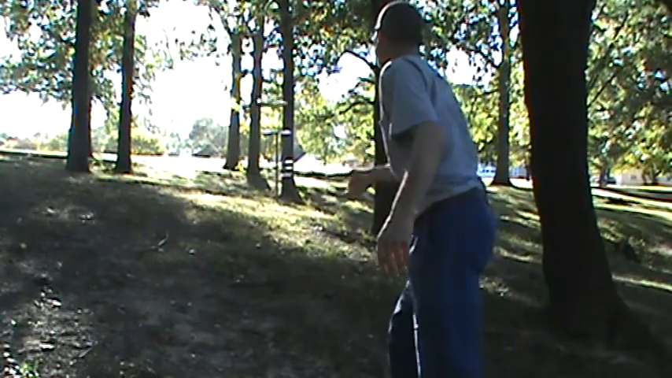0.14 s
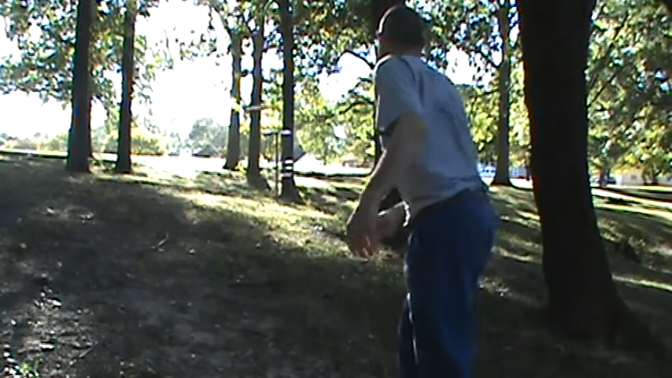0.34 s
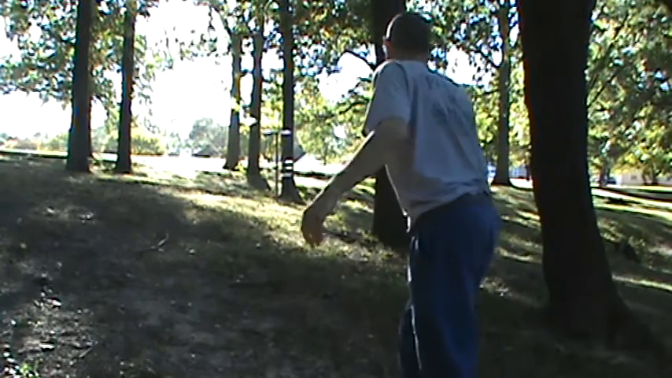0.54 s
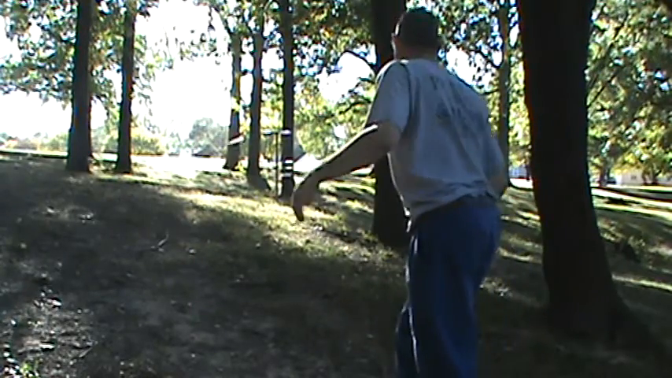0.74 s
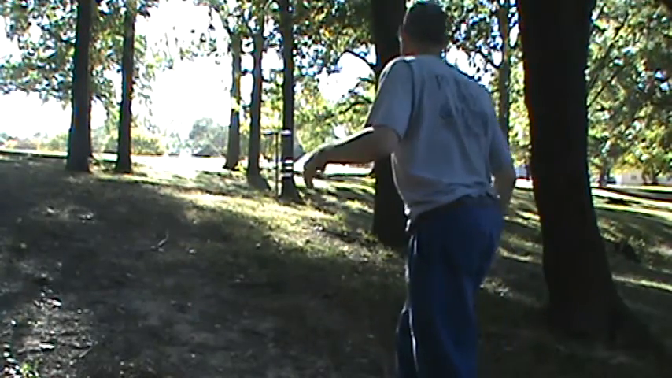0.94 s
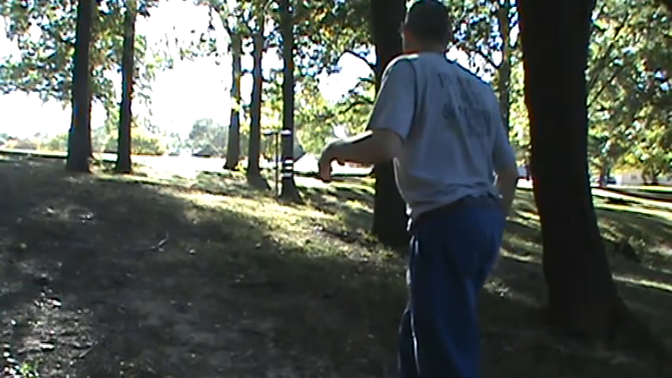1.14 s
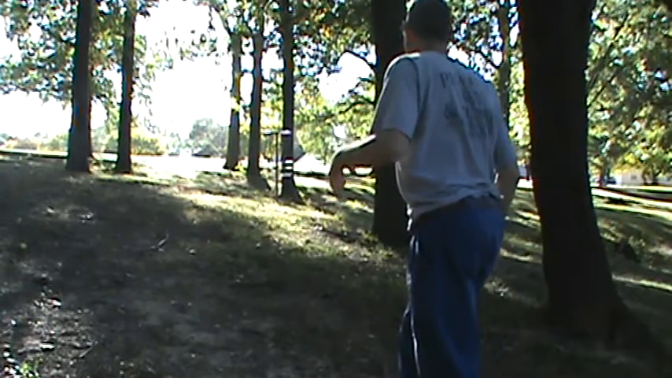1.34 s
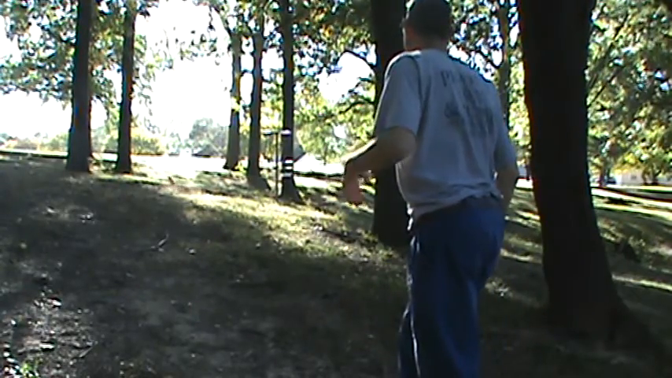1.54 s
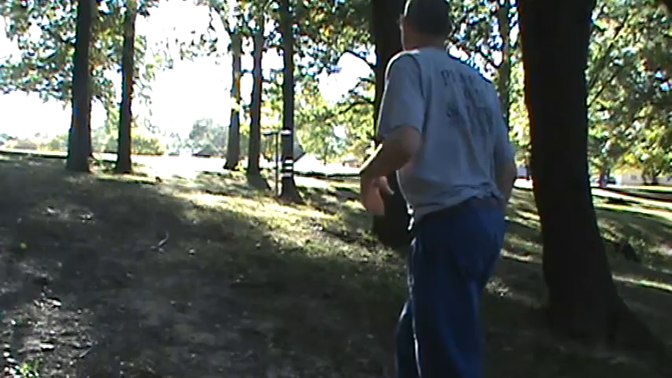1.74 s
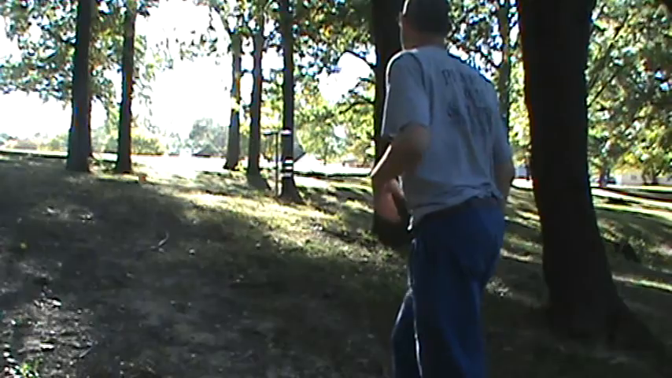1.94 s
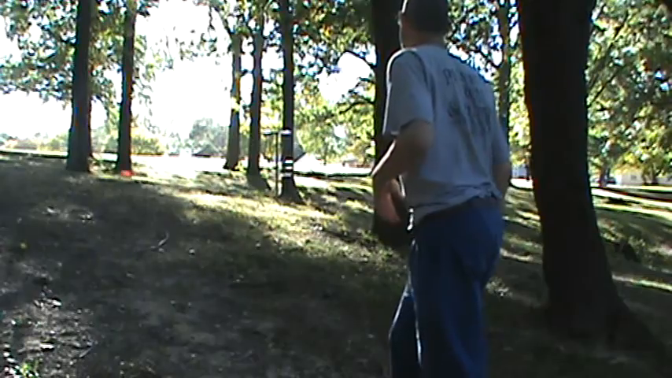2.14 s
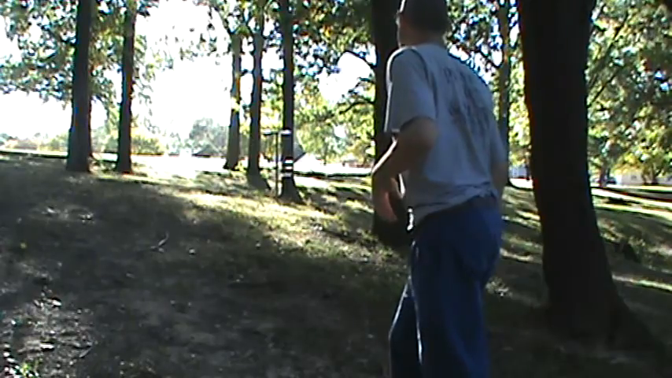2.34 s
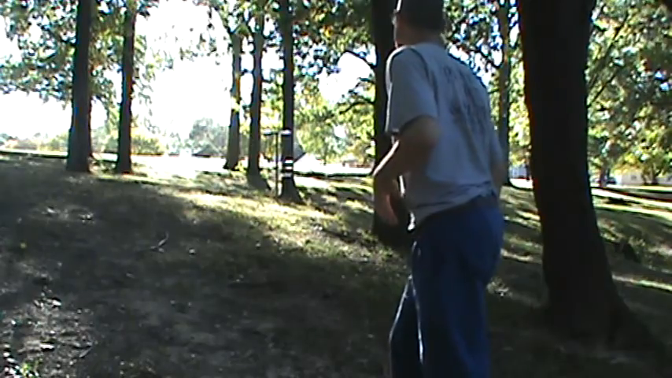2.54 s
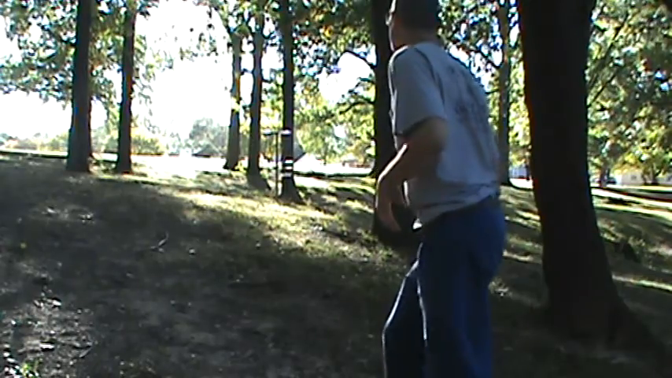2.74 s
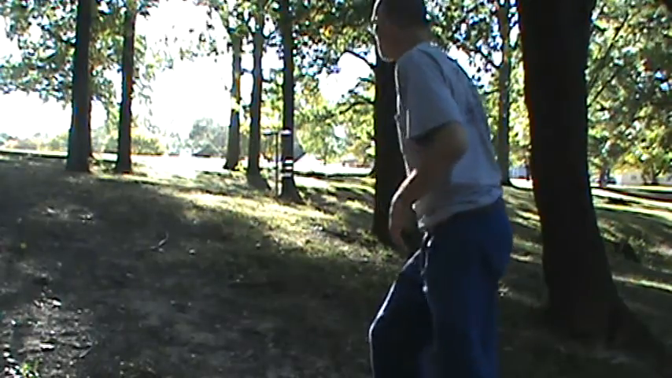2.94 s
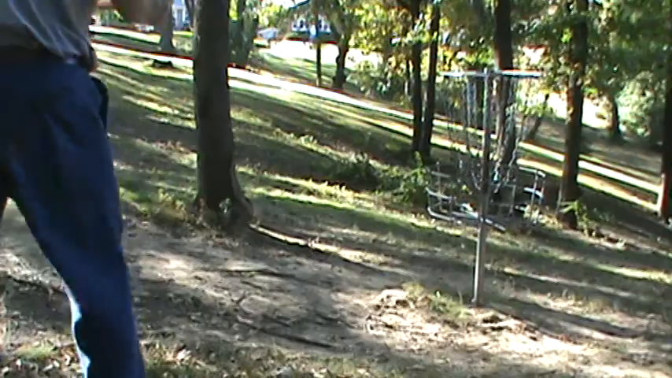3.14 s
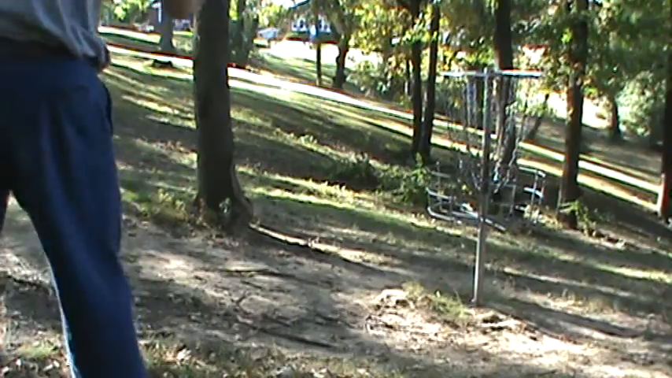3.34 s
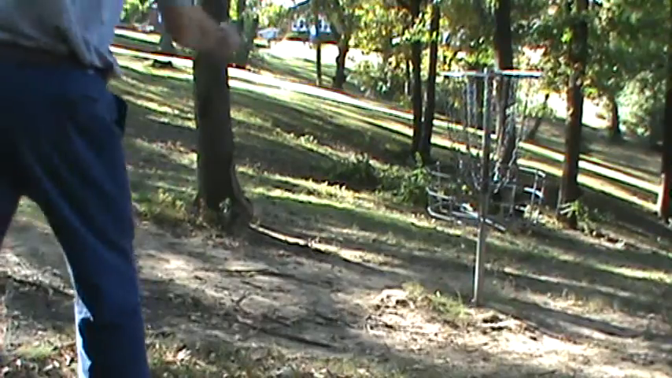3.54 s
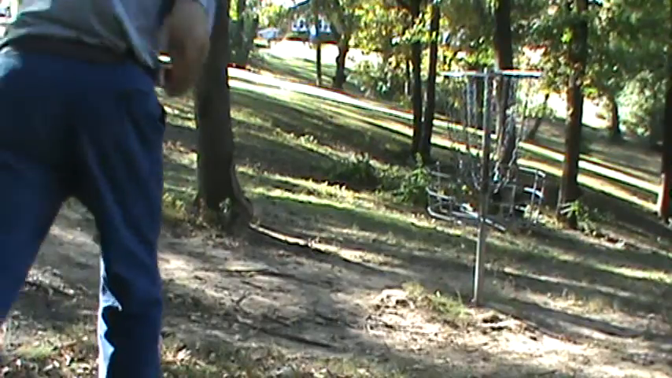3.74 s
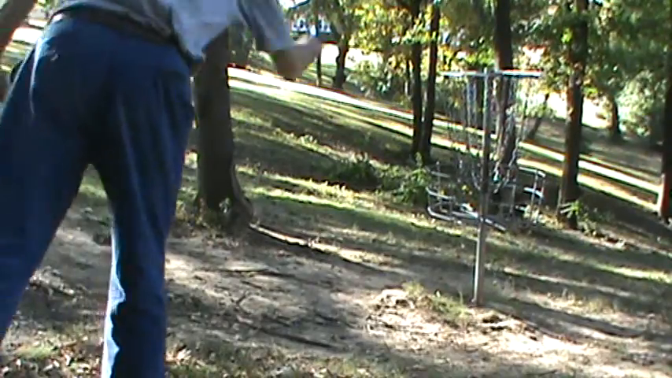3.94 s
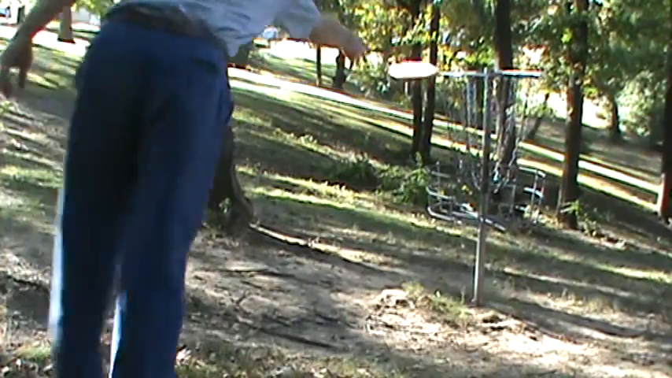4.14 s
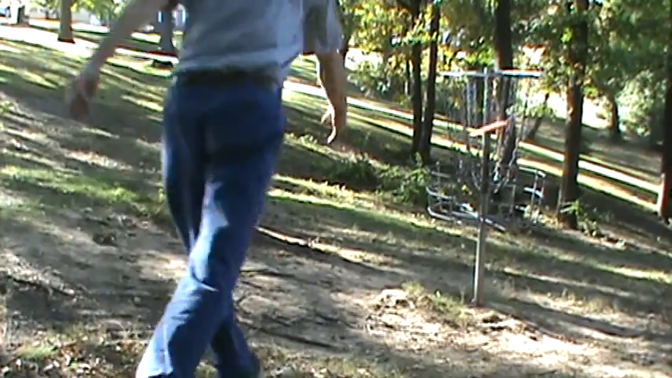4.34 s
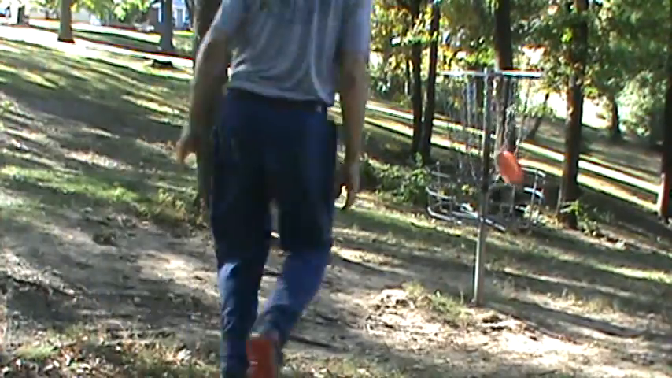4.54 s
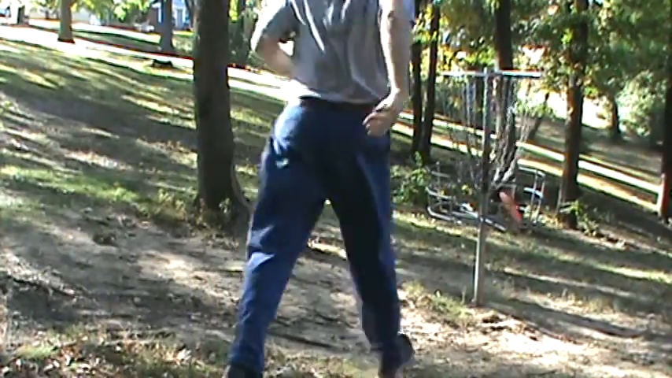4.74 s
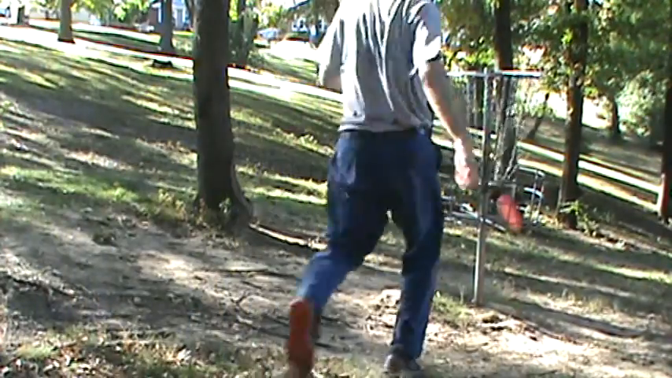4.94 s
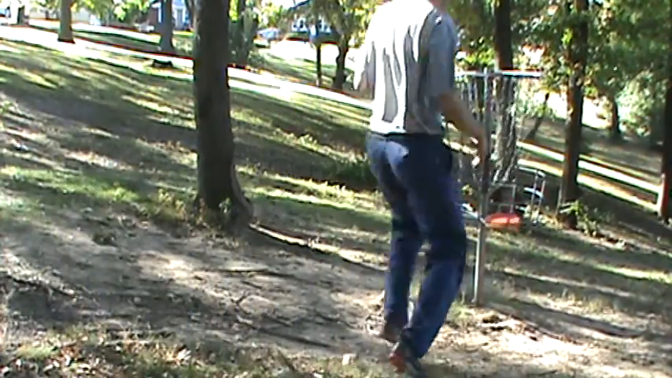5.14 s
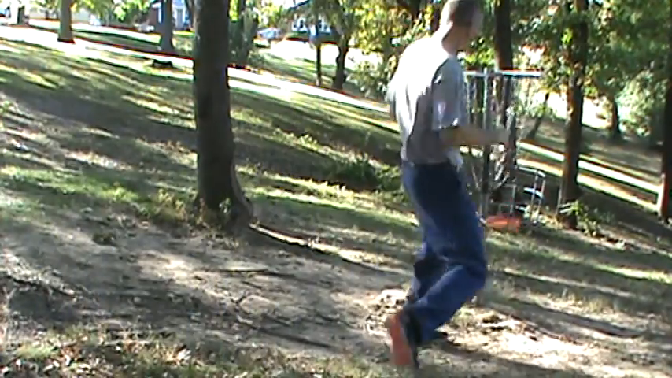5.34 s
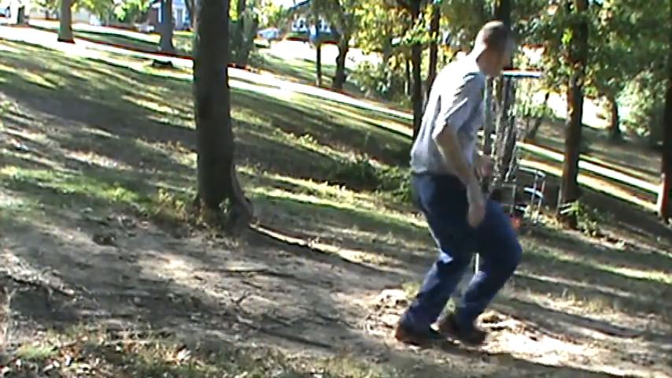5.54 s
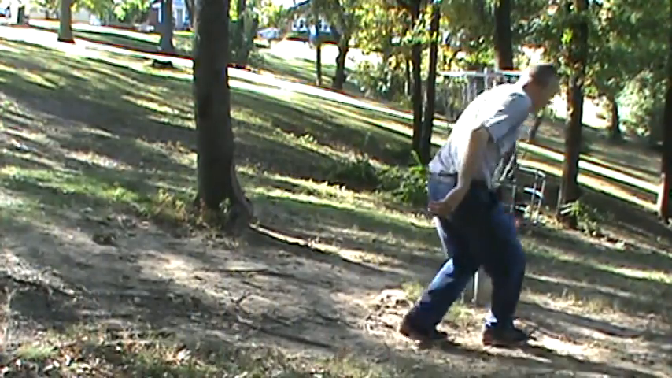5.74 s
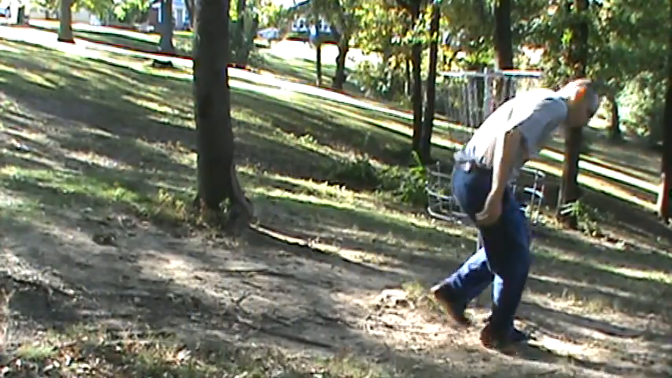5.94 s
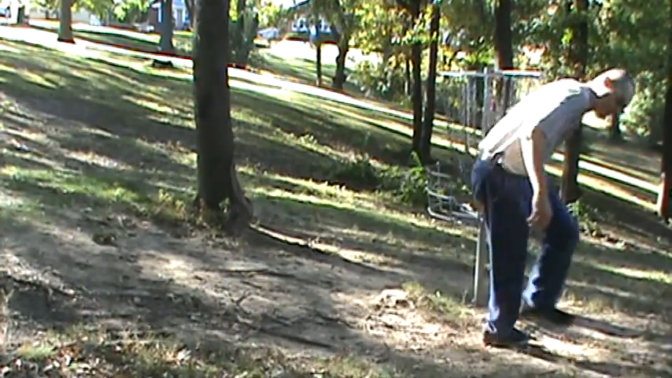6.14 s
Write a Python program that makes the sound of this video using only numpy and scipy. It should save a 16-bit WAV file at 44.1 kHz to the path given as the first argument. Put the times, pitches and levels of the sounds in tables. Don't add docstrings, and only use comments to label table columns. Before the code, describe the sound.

Footsteps crackle dry leaves and snap twigs over distant road roar, then wind buffets and a disc crashes into jangling steel chains.

```python
import sys
import numpy as np
from scipy import signal
from scipy.fft import rfft, irfft, next_fast_len
from scipy.io import wavfile

SR = 44100
rng = np.random.default_rng(int(sys.argv[2]) if len(sys.argv) > 2 else 0)


def digitize_waveform(pressure):
    field = np.atleast_2d(pressure).T
    bounded = np.clip(field, -1, 1)
    quanta = np.round(bounded * 32767).astype(np.int16)
    wavfile.write(sys.argv[1], SR, quanta)


def field_ratio(decibels):
    return 10 ** (np.asarray(decibels, dtype=float) / 20)


N = 277785
TIME = np.arange(N) / SR
CUT_S = 3.1085


def evened(x):
    return x / np.sqrt(np.mean(x ** 2) + 1e-20)


def read(points, hz):
    f, value = np.transpose(points)
    return np.interp(np.log(hz + 1), np.log(f + 1), value)


def coloured(x, points):
    size = next_fast_len(N)
    gain = field_ratio(read(points, np.fft.rfftfreq(size, 1 / SR)))
    return evened(irfft(rfft(x, size) * gain, size)[..., :N])


def band(x, hz, width_hz, order=2):
    edges = np.clip([hz - width_hz / 2, hz + width_hz / 2], 20, SR / 2 - 500)
    return signal.sosfilt(signal.butter(order, edges, "bandpass", fs=SR, output="sos"), x)


def drift(hz):
    return evened(signal.sosfilt(signal.butter(2, hz, fs=SR, output="sos"), rng.standard_normal(N)))


# f/Hz, density/dB per Hz
TRAFFIC = [(15, -36), (25, -16.5), (75, 0.5), (112, -4), (161, -6), (218, -9), (294, -10), (331, -14),
           (547, -13.5), (616, -13), (1120, -15), (1950, -26), (2500, -36), (3000, -39), (3900, -49.5),
           (6600, -120)]
# f/Hz, density/dB per Hz
HISS = [(1500, -13), (2600, -3), (3900, 6), (7000, 5), (10000, 2.5), (14800, -0.5), (15400, 10),
        (15850, -14)]
# f/Hz, correlation/1
LIKENESS = [(60, 1), (130, 1), (290, 0.94), (640, 0.87), (1410, 0.57), (3100, 0.34), (6820, 0.21),
            (15000, 0.7)]
# f/Hz, level/dB
BALANCES = [(60, 0.5), (110, -0.5), (200, 0), (380, -0.5), (700, -3), (1290, -1), (2380, 2.5), (4400, -1),
            (8120, 1.5), (15000, 0)]


def traffic(roar_db=-35.5, hiss_db=-57):
    size = next_fast_len(N)
    hz = np.fft.rfftfreq(size, 1 / SR)
    same = np.clip(read(LIKENESS, hz), -1, 1)
    lean = field_ratio(read(BALANCES, hz) / 2)
    a, b = rfft(rng.standard_normal((2, size)))
    left = a * lean
    right = (same * a + np.sqrt(1 - same ** 2) * b) / lean
    pair = irfft(np.array([left, right]), size)[:, :N]
    roar = field_ratio(roar_db + 0.58 * drift(1.07)) * coloured(pair, TRAFFIC)
    return roar + field_ratio(hiss_db) * coloured(pair, HISS)


# t/s, level/dB
GUSTS = [(3.12, -56), (3.13, -33.5), (3.5, -31.5), (3.55, -26), (3.91, -27), (4.15, -26), (4.52, -36.5),
         (4.62, -29), (5.38, -31), (5.55, -35.5), (5.64, -31), (5.9, -27), (6.12, -40.5), (6.3, -28.5)]
# f/Hz, density/dB per Hz
WIND_MID = [(12, -41), (20, -21.5), (59, -1), (81, -0.5), (145, -3.5), (248, -18.5), (286, -15.5),
            (375, -63), (600, -50), (780, -67), (1320, -120)]
# f/Hz, density/dB per Hz
WIND_SIDE = [(12, -41), (20, -23), (57, 3), (125, 9), (325, -11.5), (381, -28), (414, -13), (492, -17),
             (600, -16), (780, -49), (1320, -120)]


def wind(side_db=-3.5, lumpy_db=3.0, sweep=0.71, skew=0.2):
    eddies, others = rng.standard_normal((2, N)) * field_ratio(lumpy_db * drift(42.0))
    mid = coloured(eddies, WIND_MID)
    ahead = -signal.hilbert(eddies, next_fast_len(N))[:N].imag
    side = field_ratio(side_db) * coloured(sweep * ahead + (1 - sweep) * others, WIND_SIDE)
    push = np.array([mid + side, mid - side])
    push += skew * band(push ** 2, 460, 1100)
    gust = field_ratio(np.interp(TIME, *np.transpose(GUSTS)))
    return gust * (TIME > 3.11) * push


def trees(x):
    taps, t = np.zeros((2, 8000)), np.arange(8000) / SR
    at = np.arange(120, 7900, 40) + rng.integers(0, 40, (2, 195))
    np.put_along_axis(taps, at, rng.choice([-1., 1.], at.shape), 1)
    taps *= field_ratio(-60 * t / 0.013)
    return signal.fftconvolve(x[None], taps / np.linalg.norm(taps[0]), axes=1)[:, :N]


# peak t/s, level/dB, rise/s, fall/s, brightness/dB
SCUFFS = [(0.0, -61.5, .01, 0.071, 11.5), (0.205, -42.5, .01, 0.068, 8.5), (0.226, -43.5, 0.027, 0.028, 8),
          (0.27, -49, .08, 0.056, -3), (0.322, -50, 0.06, 0.046, 12.5), (0.3, -53, 0.027, .04, 4),
          (0.355, -50.5, 0.04, 0.06, 7), (0.38, -57.5, .03, 0.071, 7), (0.5, -75, .2, 1.4, -3),
          (1.366, -55, 0.23, 0.039, 5), (3.08, -56, 0.021, 0.055, 15.5), (3.14, -44, 0.023, 0.14, 3),
          (3.185, -36.5, 0.026, 0.044, -3), (3.208, -39, 0.014, 0.066, 6), (3.228, -41, 0.067, 0.02, 3),
          (3.255, -59, .02, 0.017, 4), (4.198, -42, 0.092, 0.014, 6), (4.305, -51.5, 0.28, .02, 8.5),
          (4.355, -40, 0.045, 0.035, 9.5), (4.422, -36.5, 0.099, 0.038, 10), (4.45, -40, .003, 0.48, 14.5),
          (4.785, -34.5, 0.059, 0.13, 2.5), (4.992, -36.5, 0.16, 0.062, 10), (5.05, -43, .1, 0.11, 11),
          (5.19, -48, 0.14, 0.53, 3), (5.435, -55, .2, 0.064, 5)]


def effort(span_db=20):
    later = TIME > CUT_S
    low = field_ratio(np.where(later, -58.5, -68.5)) ** 2
    high = low * field_ratio(np.where(later, -0.5, 5.5)) ** 2
    for peak_s, db, rise_s, fall_s, bright_db in SCUFFS:
        away = np.maximum((peak_s - TIME) / rise_s, (TIME - peak_s) / fall_s).clip(0, 9)
        power = field_ratio(db - span_db * away) ** 2
        low = low + power
        high = high + power * field_ratio(bright_db) ** 2
    return np.sqrt(low), np.sqrt(high)


def rustle(per_s=12000, spread_db=2.5, clump_db=2.05):
    grains = field_ratio(spread_db * np.minimum(rng.exponential(1, (4, N)), 5)) * rng.standard_normal((4, N))
    grains *= rng.random((4, N)) < per_s / SR
    sides = 0.1 * grains[2:, None] * np.array([[1], [-1]])
    low, high = (grains[:2, None] + sides) * field_ratio(clump_db * drift(58))
    low = evened(band(low, 3960, 7060))
    high = evened(band(high, 10030, 4900) + 0.18 * band(high, 13700, 3700))
    crunch, crackle = effort()
    return 1.48 * crunch * low + crackle * high


# f/Hz, width/Hz
SNAP_BANDS = [
    (1650, 1100),
    (8800, 3360),
    (13000, 6600),
]


def snap(rows, air_db=-8):
    out, t = np.zeros(N + 400), np.arange(200) / SR
    envelope = .35 * np.exp(-t / .00015) + .1 * np.exp(-t / .001)
    bursts = rng.standard_normal((len(rows), 200)) * envelope
    bursts[:, 0] = np.sign(bursts[:, 0])
    bursts = np.pad(bursts, ((0, 0), (0, 200)))
    for (s, db, bright_db, body_db, crack_hz), burst in zip(rows, bursts):
        bands = [SNAP_BANDS[0], (crack_hz, 0.77 * crack_hz), *SNAP_BANDS[1:]]
        part = np.array([band(burst, hz, width) for hz, width in bands])
        crack_db, tick_db = min(-bright_db, 0), min(bright_db, 0)
        gains = field_ratio(db + np.array([body_db, crack_db, tick_db, tick_db + air_db]))
        out[round(s * SR):][:400] += gains / abs(part).max(1) @ part
    return out[:N]


# t/s, level/dB, brightness/dB
LEAVES = [(0.0169, -33, 16), (0.214, -20, 12), (0.248, -33, -3), (0.2638, -32, 11), (0.328, -30, 11),
          (0.377, -29, 10), (0.283, -22, 8), (0.3065, -27.5, -14), (0.3849, -28, 16), (0.5051, -27, 9),
          (0.523, -33, 12), (0.5367, -36, 2), (0.6238, -38, 13), (0.8206, -27, 6), (0.8967, -34, -15),
          (0.942, -38, 13), (1.138, -33.5, 15), (1.212, -31, -15), (1.2518, -30, 11), (1.266, -33, 14),
          (1.362, -40, -13), (1.8143, -28, 21), (1.8258, -37, 1), (1.8331, -34, 16), (2.075, -30, 9),
          (2.923, -52, -3), (3.0403, -27, 6), (0.8124, -40, 14), (1.1771, -43, 0), (1.4473, -37, 14),
          (1.666, -36, 12), (0.4352, -35, 3),
          (3.1237, -25, -4), (3.1342, -25, -10), (3.1815, -29, -5), (3.251, -35, 5),
                (3.243, -39, 1.5), (3.2953, -35, -1), (3.3925, -25, 1), (3.4343, -28, -2), (3.488, -29, 0),
                (3.5104, -33, -4), (3.533, -35, 12), (3.921, -25.5, 8), (4.0274, -42, 12),
                (4.0955, -29, 12), (4.1388, -26, 3), (4.194, -15, 12), (4.299, -32, 1), (4.3055, -19.5, 24),
                (4.3127, -36, 13)]


def leaves(body_db=-22, crack_hz=4800):
    return snap([(*row, body_db, crack_hz) for row in LEAVES])


# t/s, level/dB, brightness (tick over crack)/dB, body/dB, crack f/Hz
TWIGS = [(0.199, -39, -8, 7.5, 3000), (0.2037, -23, 13, -9, 5500), (0.2095, -28, 0, 4, 4000),
         (0.2285, -26, 6, 0, 4000), (0.3495, -34, -6, 7, 3500), (0.513, -16, 1, -19, 5170),
         (0.5265, -4, 6.5, -12.5, 4330), (0.5419, -12, 5.5, -5.5, 4020), (0.8042, -26, 23, -7, 5040),
         (0.871, -14.5, -3.5, -13, 6300), (1.2279, -17, -6, -7, 5600), (1.3247, -17, 9, -18, 6000),
         (1.3555, -13, 3, -22, 6160), (1.5987, -12.5, 2, -13, 4900), (1.6005, -33, -10, 6, 2500),
         (3.203, -14, -3, -4, 5170), (3.233, -9, -15, -9, 5370), (3.3566, -30, 1, -1, 4000),
         (3.4765, -20.5, -5, -23, 3480), (3.4803, -24, -10, -1, 3280), (3.4855, -26, -6, -12, 2880),
         (3.7712, -31, -20, -5, 4800), (3.9996, -20.5, -2, -10, 4800), (4.1333, -46, 2.5, 8, 4800)]


def twigs():
    return snap(TWIGS)


# t/s, level/dB, brightness/dB, body/dB, crack f/Hz
TICKS = [(4.449, -3.5, -2, -20, 4400), (4.5, -18, -2, -4, 5000), (4.603, -23, -8, -24, 3600),
         (4.783, -19, -6, -20, 3500), (4.8172, -14, 1, -21, 4200), (4.8227, -6.5, 11, -20, 5500),
         (4.84, -26, -7, 0, 3440), (4.934, -5, 4, -22, 5200), (4.9728, -8, 0, -23, 4030),
         (5.019, -23, 12, -25, 6030), (5.1365, -29, -4, -20, 4500), (5.1601, -8, 1, -25, 6000),
         (5.2, -30, 10, -25, 6000), (5.241, -29, -8, -20, 4000), (5.318, -27, -6, -21, 5000),
         (5.354, -27.5, -4, 2, 3800), (5.433, -31, -4, -17, 4000), (5.6156, -32, -2, -1, 4950),
         (5.6635, -22, 3, -10, 5200), (5.945, -24, -8, -10, 4480), (6.0004, -28, 0, -20, 6000),
         (6.0655, -20, 5, -9, 5000)]


def ticks():
    return snap(TICKS)


def rattle(count=36, per_s=900, level_db=-6, t60=.03):
    t, out = np.arange(3000) / SR, np.zeros(N)
    taps = field_ratio(4.1 * np.minimum(rng.exponential(1, N), 3)) * (rng.random(N) < per_s / SR)
    taps *= effort()[0] * (TIME > 4.449) * (TIME < 5.46)
    link = rng.integers(0, count, N)
    for k, hz in enumerate(np.geomspace(3000, 11500, count) * rng.uniform(1.0, 1.03, count)):
        ring_out = field_ratio(-60 * t / t60) * np.sin(2 * np.pi * hz * t)
        out += signal.oaconvolve(taps * (link == k), ring_out)[:N]
    return field_ratio(level_db) * out


# t/s, level/dB, f/Hz, t60/s
KNOCKS = [(4.449, -26, 1090, 0.035), (4.449, -31, 1270, 0.025), (4.45, -29, 1930, 0.037),
          (4.449, -19, 3970, 0.029), (4.449, -34, 3050, .02), (4.49, -24, 890, .015),
          (4.501, -22.5, 910, 0.022), (4.501, -26.5, 5540, 0.065), (4.541, -18, 890, 0.018),
          (4.593, -28, 5400, .03), (4.6, -21, 3440, 0.028), (4.933, -38, 5190, .04),
          (4.972, -24, 3820, .03), (5.24, -40, 3780, 0.099), (5.243, -46, 4790, .12), (5.25, -40, 3410, .2),
          (5.355, -45, 3800, 0.12), (5.431, -48, 3770, .15), (5.44, -49, 4900, 0.18)]


def knocks():
    out, t = np.zeros(N), np.arange(5000) / SR
    for s, db, hz, t60 in KNOCKS:
        out[round(s * SR):][:5000] += field_ratio(db - 60 * t / t60) * np.sin(2 * np.pi * hz * t)
    return out


def steel(hits, modes, scatter_db, rise_s, apart, wobble):
    hz, db, t60 = np.transpose(modes)
    pole = 2j * np.pi * hz - np.log(1000) / t60
    ports = np.exp(1j * apart * rng.standard_normal(len(hz))[:, None] * [1, -1])
    sway = np.exp(wobble * (drift(17) / 2 + 1j * drift(90)))[:, None]
    luck = rng.standard_normal((len(hits), 2, len(hz)))
    starts = [round(row[0] * SR) for row in hits] + [N]
    out, state = np.zeros((N, 2), complex), np.zeros(len(hz), complex)
    for (s, hit_db, keep, *aim), a, b, (size, place) in zip(hits, starts, starts[1:], luck):
        t = np.arange(max(b - a, 0) + 1)[:, None] / SR
        strike = field_ratio(hit_db + db + scatter_db * size) * np.sign(place)
        if aim:
            lean_db, face = aim
            strike[:2] = abs(strike[:2]) * field_ratio(lean_db * np.array([1, -1])) * [np.sign(face), 1]
            strike = strike * np.exp(1j * np.angle(state[1]))
        soft = 1 + 12 * min(abs(state).sum() / abs(strike).sum(), 1)
        onset = 1 - np.exp(-t / (rise_s * soft))
        held = state * (1 - (1 - np.clip(keep, 0, 1)) * onset)
        swing = (held + strike * onset) * np.exp(pole * t)
        out[a:b] = swing[:-1] @ ports
        state = swing[-1]
    return (out * sway).imag.T


def spray(hits, low_hz, high_hz, db, t60, lag_s, count=40):
    out, t = np.zeros((2, N + 3000)), np.arange(3000)[:, None] / SR
    fade = np.cos(np.linspace(0, np.pi / 2, 3000))
    luck = rng.random((len(hits), 4, count))
    for (s, hit_db, *_), (pitch, wait, size, side) in zip(hits, luck):
        hz = low_hz * (high_hz / low_hz) ** pitch ** 1.5
        age = np.maximum(t + lag_s * np.log(np.minimum(2 * wait, 1)), 0)
        level = field_ratio(hit_db + db - 2.2 * size - 60 * age / t60 * (hz / low_hz) ** 2)
        rings = level * np.sin(2 * np.pi * (hz * age + 7 * size))
        rings *= 1 - np.exp(-age / .0007)
        pan = np.array([.8 + .4 * side, 1.2 - .4 * side])
        out[:, round(s * SR):][:, :3000] += fade * (rings @ pan.T).T
    return out[:, :N]


# t/s, level/dB
LINK_HITS = [(4.451, -20.5), (4.457, -15), (4.4753, -15.5), (4.487, -14), (4.497, -10.5), (4.507, -13),
             (4.517, -14), (4.535, -13), (4.603, -20), (4.628, -21), (4.658, -23), (4.704, -19),
             (4.721, -19.5), (4.769, -36), (4.816, -39), (4.9, -31), (4.934, -27), (5.045, -32.5),
             (5.083, -33), (5.184, -32), (5.23, -41), (5.25, -26.5), (5.282, -33.5), (5.358, -31),
             (5.375, -31.5), (5.503, -43.5), (5.664, -37), (5.691, -41), (5.707, -35), (5.945, -41),
             (6.199, -49), (6.217, -47)]
LINK_CHOKES = [4.748, 5.32, 5.4, 5.535, 5.78, 6.26]
# f/Hz, level/dB, t60/s
LINKS = [(11770, -4, .2), (11881, -3, .28), (11936, -4, .24), (12234, -11, .12), (12585, -11, .13),
         (12662, -11, .17), (13684, -16, .1)]
# low f/Hz, high f/Hz, level/dB, t60 at low f/s, mean lag/s
LINK_CROWD = (11500, 14000, -23, .05, -4)


def links():
    hits = [(s, db, 0.61) for s, db in LINK_HITS]
    hits = sorted(hits + [(s, -66, 0.21) for s in LINK_CHOKES])
    return steel(hits, LINKS, 3.9, 0.00049, 0.29, 0.59) + spray(hits, *LINK_CROWD)


# t/s, level/dB
OVERTONE_HITS = [(4.451, -23), (4.526, -20), (4.548, -12), (4.576, -17), (4.603, -7.5), (4.635, -16),
                 (4.722, -22), (4.777, -28.5), (4.818, -42), (4.934, -17), (4.991, -36), (5.015, -52),
                 (5.035, -29), (5.156, -39), (5.2273, -21.5), (5.277, -47), (5.613, -28), (5.645, -48),
                 (5.663, -32), (5.944, -26.5), (6.021, -32.5), (6.135, -34.5)]
# f/Hz, level/dB, t60/s
ROD_OVERTONES = [(8005, -10, .25), (8037, -5, .32), (8120, -13, .16), (8182, -14, .12), (8489, -13, .06),
                 (8822, -15, .05), (9276, -13, .07), (10131, -15, .05), (10435, -15, .06), (15208, -23, .08),
                 (15640, -25, .06)]
# low f/Hz, high f/Hz, level/dB, t60 at low f/s, mean lag/s
OVERTONE_CROWD = (8100, 11300, -14, .045, .006)


def overtones():
    hits = [(s, db, 0.72) for s, db in OVERTONE_HITS]
    return steel(hits, ROD_OVERTONES, 4.4, 0.00047, 0.17, 0.11) + spray(hits, *OVERTONE_CROWD)


# low f/Hz, high f/Hz, level/dB, t60 at low f/s, mean lag/s
TOP_CROWD = (14900, 15800, -38, 0.2, 1)


def shimmer():
    return spray(OVERTONE_HITS, *TOP_CROWD)


# t/s, level/dB, lean to lowest mode/dB, face +1 or -1
ROD_HITS = [(4.45, -41.5, -6.5, 1), (4.527, -22, 2, -1), (4.552, -26, -5.5, 1), (4.567, -21, 5, -1),
            (4.609, -15, 2, -1), (4.651, -24, 9, -1), (4.68, -20, 1, 1), (4.703, -23, -2.5, -1),
            (4.741, -23, 2.5, 1), (4.765, -24.5, -4, -1), (4.809, -23, 1, 1), (4.835, -32, 0, 1),
            (4.858, -29, 4, 1), (4.88, -32, 8.5, -1), (4.933, -29, -4, 1), (4.962, -31, 4, -1),
            (5.001, -24, -3.5, -1), (5.046, -30.5, 8.5, -1), (5.087, -26, -1, -1), (5.135, -30.5, 4, -1),
            (5.18, -45, -2, -1), (5.216, -31, 4.5, -1), (5.264, -36, 1, -1), (5.326, -40, 4, -1),
            (5.369, -43.5, -2.5, -1), (5.51, -51, -5, 1), (5.614, -38.5, 4.5, 1), (5.66, -35, 3, -1),
            (5.704, -41, 4, -1), (5.943, -24, -2.5, -1), (6.04, -31.5, -3.5, -1), (6.164, -36, -0.5, -1),
            (6.2, -50, 0, -1), (6.23, -49, -2, -1), (6.252, -41.5, -2.5, -1)]
# f/Hz, level/dB, t60/s
RODS = [(2852, -4, .6), (2876, -1, .75), (2934, -13, .35), (3049, -11, .3), (3235, -20, .12)]
# low f/Hz, high f/Hz, level/dB, t60 at low f/s, mean lag/s
ROD_CROWD = (2980, 3500, -28, .1, .012)


def rods():
    hits = [(s, db, 0.035, *aim) for s, db, *aim in ROD_HITS]
    return steel(hits, RODS, 1.7, .0006, 0.21, .09) + spray(hits, *ROD_CROWD)


def scene():
    basket = rods() + overtones() + links() + knocks()
    snaps = leaves() + twigs() + ticks()
    feet = snaps * field_ratio(np.array([[-.5], [.5]])) + rustle()
    echoes = trees(field_ratio(-30.5) * basket.mean(0) + field_ratio(-16.0) * feet.mean(0))
    near = basket * field_ratio(np.array([[-.4], [.4]])) + feet + rattle() + shimmer()
    return near + echoes + traffic() + wind()


def band_limit(x):
    return signal.sosfilt(signal.butter(12, 16810, fs=SR, output="sos"), x)


def record(dry):
    ceiling = .7
    soft = ceiling * np.tanh(dry / ceiling)
    inside = signal.oaconvolve(soft, signal.firwin(401, 16000, fs=SR)[None], "same")
    leaky = inside + field_ratio(-40) * (soft - inside)
    fade = np.clip(abs(TIME - CUT_S) / .017, .08, 1) ** 3.5
    return band_limit(leaky * fade)


dry = scene()
out = record(dry)
digitize_waveform(out)
```